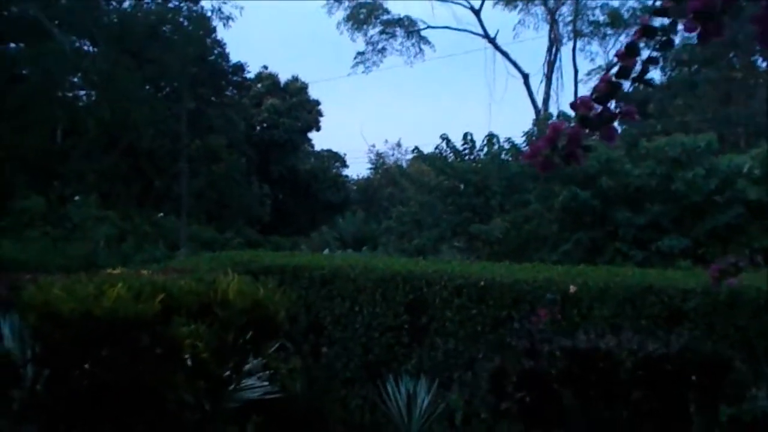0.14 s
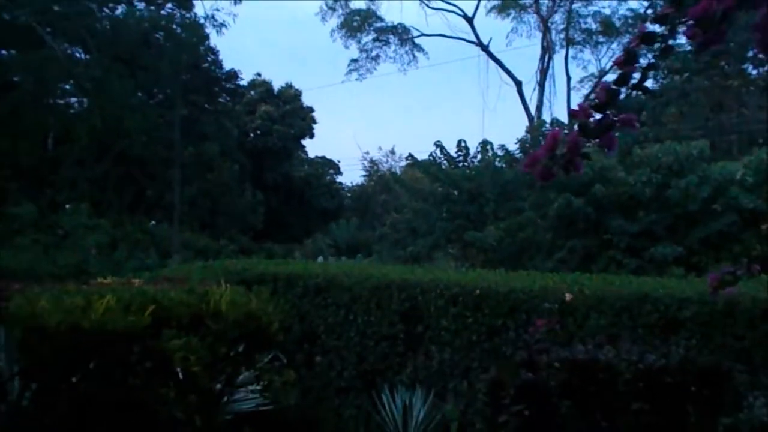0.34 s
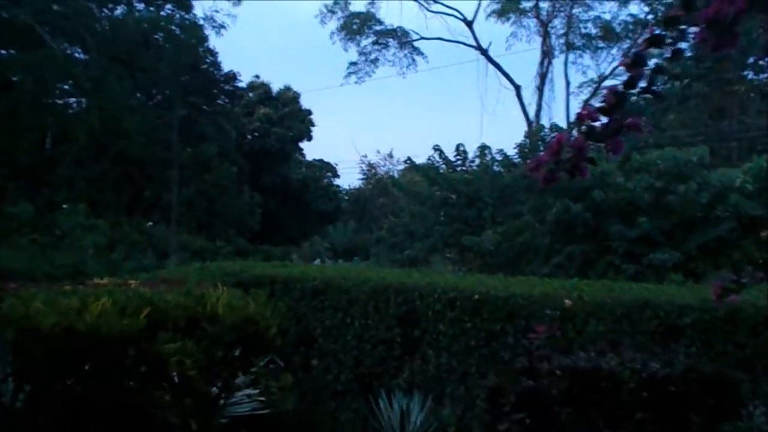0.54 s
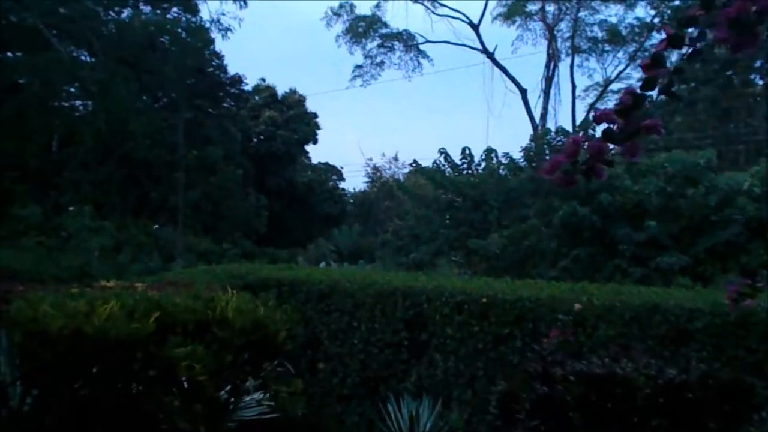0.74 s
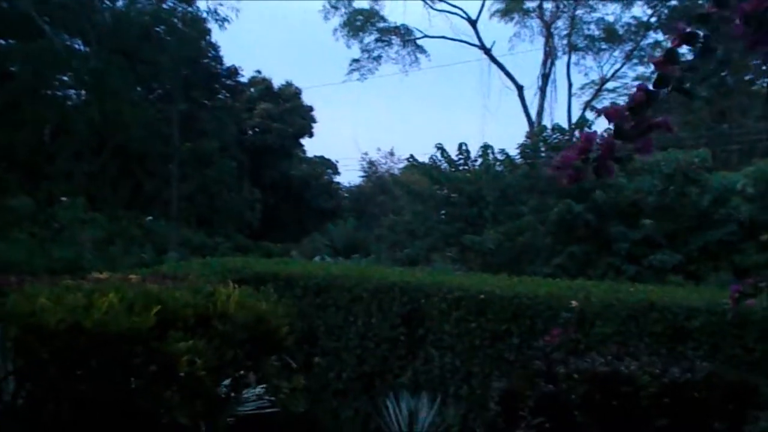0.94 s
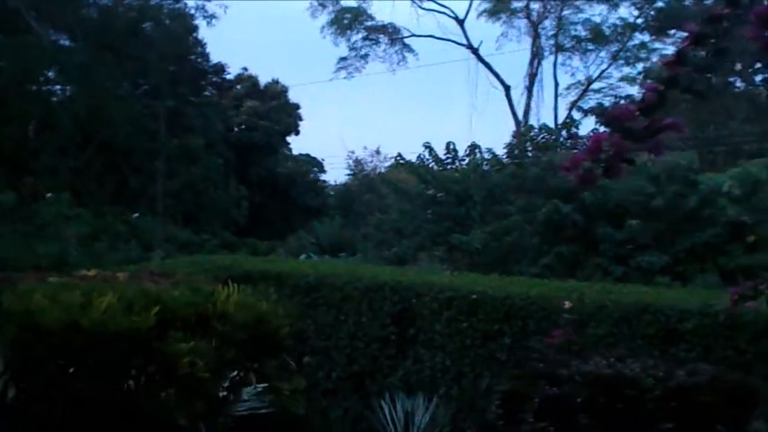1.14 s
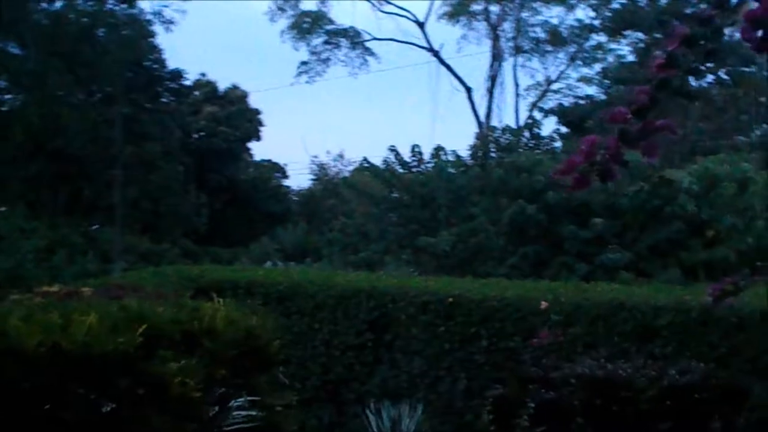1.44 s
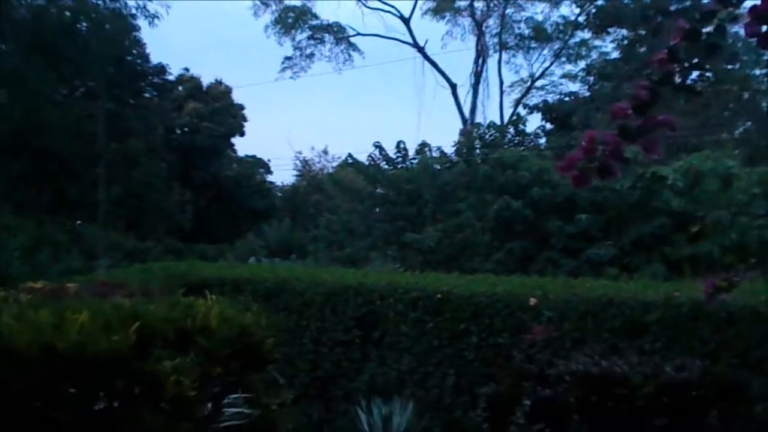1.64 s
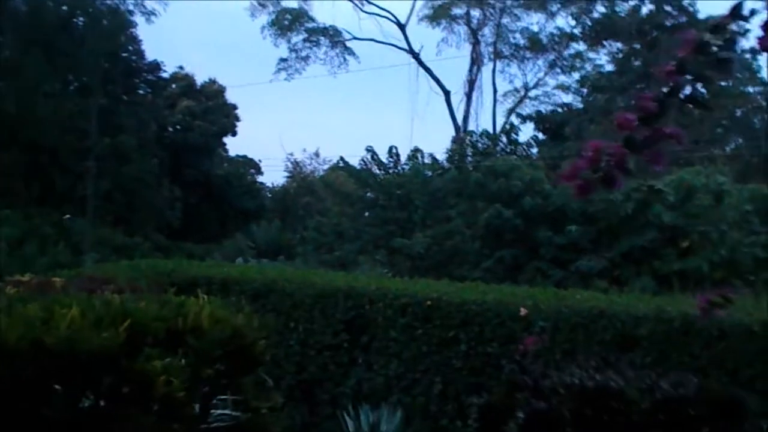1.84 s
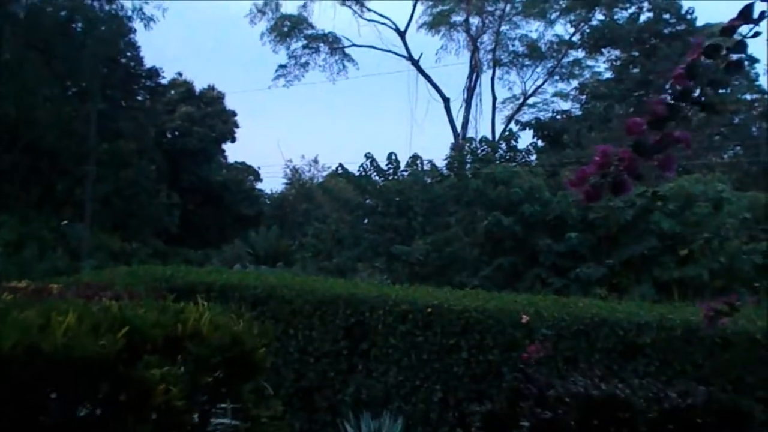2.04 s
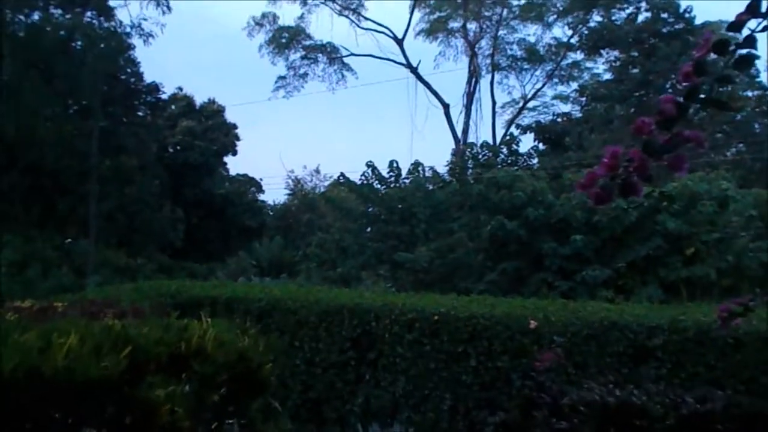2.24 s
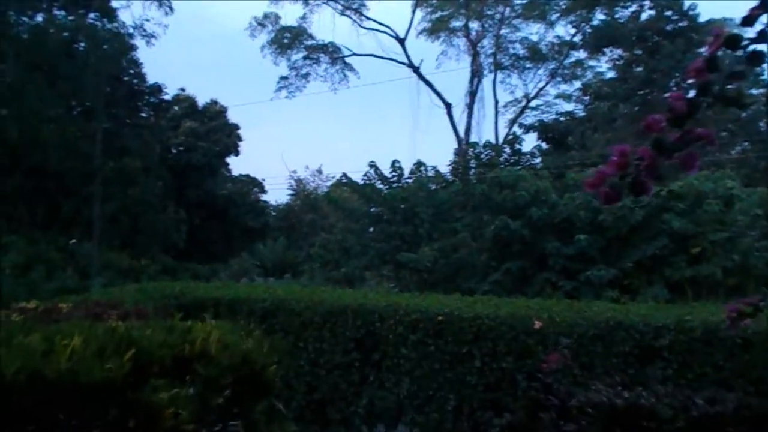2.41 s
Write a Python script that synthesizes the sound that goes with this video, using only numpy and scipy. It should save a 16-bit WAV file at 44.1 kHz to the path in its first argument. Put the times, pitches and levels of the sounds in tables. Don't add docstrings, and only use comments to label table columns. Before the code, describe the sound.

Distant howler monkeys roar hoarsely from the start, with overlapping hollow hoots, weakening after 1.5 seconds and nearly gone by 2.5. A frog pipes broken notes on one pitch throughout. Paired bird whistles come near 0.4, 1.1 and 1.9 seconds; a chip trill slows until 1.3. A harsh rasp bursts at 1.06, a sharp close beak snap at 2.1. Insects and air hiss continue; trees add echo.

```python
import sys
import numpy as np
from scipy import signal
from scipy.fft import rfft, irfft
from scipy.io import wavfile
from scipy.ndimage import uniform_filter1d

SR = 44100
rng = np.random.default_rng(int(sys.argv[2]) if len(sys.argv) > 2 else 0)


def dump(signal):
    limited = np.clip(np.atleast_2d(signal).T, -1, 1)
    pcm = np.round(limited * 32767).astype(np.int16)
    wavfile.write(sys.argv[1], SR, pcm)


def undo_db(level):
    steps = np.asarray(level, float) / 20
    return 10 ** steps


N = 113337
TIME = np.arange(N) / SR

# [t/s, effort level/dB, upper throat resonance f/Hz]
ROAR = [(0, -21.5, 813), (0.151, -23, 960), (.36, -25.5, 858), (0.498, -22.5, 843), (.8, -24, 922),
        (1.05, -25.5, 872), (1.25, -26, 817), (1.48, -28, 924), (1.702, -28.5, 876), (1.9, -31.5, 884),
        (2.57, -37, 932)]
GROWL_HZ = [61.8, 82.04, 100.8]
# [f/Hz, width/Hz, level/dB]
THROAT_SAC = [(438.5, 46.6, -7), (504, 71, 1.5), (670, 90, -5.5), (1424, 177, -8)]
# [t/s, level/dB, low ring f/Hz]
LOW_RING = [(0, -2.5, 499.5), (.3, -1.5, 500), (.5, -1.5, 503.4), (.8, -1, 491.5), (1.2, -0.5, 468),
            (1.4, 0.5, 478), (1.6, -1.5, 481), (2.0, -2, 486), (2.57, -1, 506)]
# [t/s, length/s, from f/Hz, to f/Hz, level/dB]
HOOTS = [(0, .11, 860, 910, -27.5), (.12, .13, 980, 1000, -31), (.15, .09, 520, 535, -31),
         (.27, .1, 930, 960, -34), (.35, .07, 840, 830, -30), (.43, .17, 512, 495, -25),
         (.475, .06, 815, 812, -26), (.52, .12, 770, 800, -30), (.62, .13, 495, 478, -29),
         (.69, .08, 930, 960, -30), (.8, .085, 830, 815, -28), (.86, .06, 900, 960, -31),
         (.82, .13, 480, 490, -30), (.89, .12, 760, 730, -32), (.97, .06, 935, 930, -33),
         (1.0, .05, 450, 450, -31), (1.06, .15, 490, 455, -30), (1.08, .08, 870, 860, -30),
         (1.18, .13, 860, 830, -30), (1.2, .11, 720, 715, -32), (1.385, .11, 495, 478, -22),
         (1.46, .09, 960, 940, -31), (1.6, .13, 930, 870, -27.5), (1.72, .09, 900, 890, -33),
         (1.67, .165, 510, 495, -25)]
# [t/s, length/s, from f/Hz, to f/Hz, level/dB]
MOAN = [
    (.08, .27, 297.6, 311.3, -49.5),
    (.36, 1.06, 313, 273.8, -51.5),
]
# [t/s, length/s, level/dB]
FROG_NOTES = [(0, .022, -23), (.075, .095, -27.5), (.19, .2, -33), (.42, .115, -30), (.555, .155, -30),
              (.725, .12, -31), (.85, .135, -28.5), (1.0, .05, -28), (1.08, .07, -30), (1.195, .055, -28),
              (1.26, .155, -29), (1.432, .11, -30), (1.585, .072, -27.5), (1.68, .045, -26.5),
              (1.795, .085, -30), (1.905, .065, -28), (1.995, .105, -28), (2.135, .21, -29),
              (2.385, .035, -32), (2.49, .045, -35)]
# [t/s, level/dB]
AIR_LEVEL = [(0, -24), (.5, -27), (1.15, -23.5), (1.65, -27), (2.001, -26.5), (2.57, -27.5)]
# [f/Hz, level/dB]
AIR_COLOUR = [(200, -78), (370, -27), (700, -7.5), (1900, -11.5), (2750, -1), (4730, -23.5), (7500, -29.5),
              (10400, -30.5), (11000, -58)]
# [f/Hz, width/Hz, level/dB, throb rate/Hz]
INSECTS = [
    (2750, 450, -33, 33),
    (5900, 800, -40, 22),
    (10860, 120, -66, 5),
]
# [t/s, top f/Hz, level/dB]
CHIPS = [(.05, 6500, -38), (.14, 6800, -40), (0.224, 6400, -36.5), (.312, 6390, -33.5), (.396, 6300, -32.5),
         (0.487, 6300, -32.5), (0.573, 6200, -33), (0.668, 6350, -33), (0.755, 5980, -35)]
# [t/s, top f/Hz, level/dB]
LATE_CHIPS = [(.846, 5800, -36.5), (0.947, 5800, -31.5), (1.03, 5500, -27), (1.163, 5750, -29),
              (1.279, 5800, -33)]
# [t/s, length/s, from f/Hz, to f/Hz, level/dB]
RISERS = [
    (.352, 0.14, 2242, 3050, -18),
    (1.1, 0.12, 2322, 2990, -21),
    (1.84, 0.11, 2294, 2953, -21),
]
# [t/s, length/s, from f/Hz, to f/Hz, level/dB]
LEVELLERS = [
    (.525, .175, 2260, 2850, -20),
    (1.255, .155, 2290, 2820, -21),
    (1.995, .165, 2270, 2800, -21),
    (0.069, 0.075, 2825, 2810, -18.5),
]
# [t/s, length/s, from f/Hz, to f/Hz, level/dB]
BUZZES = [(1.115, .075, 6400, 8800, -37), (1.17, .16, 8800, 8750, -41), (.12, .07, 9600, 8300, -51),
          (.13, .15, 9550, 9450, -55), (.525, .06, 8550, 7700, -50), (.55, .12, 8450, 8350, -54),
          (.782, .014, 8200, 6500, -44), (1.375, .07, 4500, 6000, -39), (1.925, .075, 8500, 8100, -47),
          (.27, .012, 9500, 7300, -48), (1.93, .64, 3400, 3350, -32)]
# [t/s, length/s, from f/Hz, to f/Hz, level/dB]
WHISTLES = [(.59, 0.073, 3150, 3310, -28.5), (.61, 0.19, 4000, 4550, -40), (.725, 0.057, 4000, 3800, -32),
            (.76, 0.18, 3700, 3350, -28.5), (.88, 0.12, 3250, 3400, -30), (1.308, 0.115, 7400, 6600, -27.5),
            (1.8, 0.2, 7400, 7330, -47), (2.0, 0.25, 7200, 7100, -46), (2.45, 0.12, 3350, 3150, -31),
            (2.3, .08, 3400, 3520, -37), (1.49, 0.04, 3550, 3600, -36), (1.53, 0.04, 3900, 4050, -43),
            (2.0, .07, 3650, 3700, -41)]
# [f/Hz, level/dB]
RASP_COLOUR = [(900, -48), (1500, -19.5), (2780, -4), (4050, -13), (5330, -14.5), (7000, -17), (10400, -19),
               (11200, -46)]
# [t/s, f/Hz]
RASP_BEAK = [
    (1.0, 2300),
    (1.04, 2760),
    (1.058, 3110),
    (1.08, 2660),
    (1.12, 2400),
]
# [t/s, level/dB]
RASP_JOLTS = [(1.031, -12), (1.0395, -8), (1.0455, -7), (1.0603, -1.5), (1.0685, -9), (1.0745, -7),
              (1.0795, -9), (1.084, -8), (1.1, -9)]
# [t/s, length/s, from f/Hz, to f/Hz, level/dB]
FAR_CHIRPS = [(1.485, .07, 4900, 5350, -37), (1.62, .055, 4850, 5150, -36), (1.735, .075, 4100, 4650, -41),
              (1.865, .1, 4100, 4750, -42), (2.02, .06, 3900, 4500, -42), (2.155, .075, 4100, 4550, -38.5)]
TREBLE_DIPS = [.34, 1.434, 1.512, 1.554, 1.598, 1.64, 1.789, 2.108, 2.193]


def evened(x):
    return x / np.sqrt(np.mean(x ** 2) + 1e-20)


def add(mix, s, sound):
    part = mix[max(round(s * SR), 0):][:len(sound)]
    part += sound[:len(part)]


def slow(hz):
    spectrum = rfft(rng.standard_normal(N))
    return evened(irfft(spectrum / (1 + (np.fft.rfftfreq(N, 1 / SR) / hz) ** 4), N))


def resonate(x, hz, width):
    turn = np.exp(2j * np.pi * np.cumsum(hz * np.ones(len(x))) / SR)
    r = np.exp(-np.pi * width / SR)
    return 2 * (turn * signal.lfilter([1 - r], [1, -r], x / turn)).real


def resonate_twice(x, hz, width):
    return resonate(resonate(x, hz, width), hz, width)


def coloured(x, points):
    f, db = np.transpose(points)
    log_hz = np.log(np.fft.rfftfreq(N, 1 / SR) + 1)
    return evened(irfft(rfft(x) * undo_db(np.interp(log_hz, np.log(f), db)), N))


def trees(x, t60, wet_db):
    t = np.arange(SR // 2) / SR
    tail = rng.standard_normal(len(t)) * undo_db(-60 * t / t60) * np.minimum(t / 0.011, 1)
    return x + undo_db(wet_db) * signal.fftconvolve(x, tail / np.linalg.norm(tail))[:N]


def whistles(rows, bend, swell, flutter_db, blur_hz, blur_rate_hz):
    out, flutter, blur = np.zeros(N), slow(48), slow(blur_rate_hz)
    for start, length, from_hz, to_hz, db in rows:
        at = round(start * SR)
        u = (np.arange(0, length, 1 / SR) / length)[:N - at]
        now = slice(at, at + len(u))
        hz = to_hz + (from_hz - to_hz) * (1 - u) ** bend + blur_hz * blur[now]
        shape = np.sin(np.pi * u ** swell) ** 0.53 * undo_db(db + 1.5 + flutter_db * flutter[now])
        add(out, start, shape * np.sin(2 * np.pi * np.cumsum(hz) / SR))
    return out


def howlers():
    drive = 0.51 * rng.standard_normal(N)
    for hz in GROWL_HZ:
        turns = np.cumsum(hz * (1 + .25 * slow(40))) / SR
        drive = drive + .5 * evened(np.exp(-(turns % 1) / 0.076) * rng.standard_normal(N))

    def ring(hz, width):
        return resonate_twice(drive, hz, width) * np.sqrt(100 / width)

    s, effort_db, upper_hz = np.transpose(ROAR)
    low_s, low_db, low_hz = np.transpose(LOW_RING)
    shift = np.interp(TIME, low_s, low_hz) / 500
    lower = sum(undo_db(g) * ring(hz * shift * (1 + 0.026 * slow(4.5)), w) for hz, w, g in THROAT_SAC)
    glide_hz = np.interp(TIME, s, upper_hz)
    upper = sum(undo_db(g) * ring(share * glide_hz, 150) for share, g in [(1.023, -1.1), (0.888, -1.46)])
    throat = undo_db(np.interp(TIME, low_s, low_db)) * lower + undo_db(0.5) * upper
    roar = undo_db(-1.5 + np.interp(TIME, s, effort_db)) * evened(trees(throat, t60=.3, wet_db=-4))
    hoots = whistles(HOOTS, 1.1, .9, 2.5, 10, 30)
    moan = whistles(MOAN, 1.4, 1.13, 2.2, 9.3, 15)
    return roar + trees(hoots + moan, 0.19, -6)


def frog():
    gate = np.zeros(N)
    for s, length, db in FROG_NOTES:
        gate += undo_db(db) * np.clip(np.minimum(TIME - s + 0.012, s + length - TIME) / 0.018, 0, 1)
    flutter = undo_db(2.4 * slow(45))
    pitch_hz = 2175 + 12 * slow(19.7)
    tone = np.sqrt(2) * np.sin(2 * np.pi * np.cumsum(pitch_hz) / SR)
    return trees(gate * flutter * tone, 0.3, -13)


def air():
    s, db = np.transpose(AIR_LEVEL)
    return undo_db(-2 + np.interp(TIME, s, db)) * coloured(rng.standard_normal(N), AIR_COLOUR)


def insects():
    out = np.zeros(N)
    for hz, width, db, rate in INSECTS:
        band = evened(resonate_twice(rng.standard_normal(N), hz, width))
        level = undo_db(db + 0.34 * slow(22))
        throb = 1 + .25 * np.sin(2 * np.pi * np.cumsum(rate * (1 + 0.205 * slow(3.1))) / SR)
        out = out + level * band * throb
    return out


def chip_trill():
    length, from_hz = 0.037, 5100
    chips = [(s, length, from_hz, hz, db) for s, hz, db in CHIPS]
    late = [(s, length, from_hz, hz, db) for s, hz, db in LATE_CHIPS]
    trill = whistles(chips, 2.2, 1.1, 2.5, 60, 200) + whistles(late, 1.9, .45, 2.5, 50, 200)
    return trees(trill, .25, -2.5)


def paired_whistles():
    risers = whistles(RISERS, 1.4, 1.3, 1.8, 14, 103)
    levellers = whistles(LEVELLERS, 1.9, 1.2, 1.8, 14, 103)
    return trees(risers + levellers, 0.45, -5.5)


def buzzes():
    return trees(whistles(BUZZES, 1.3, .8, 2.5, 200, 500), .4, -1.5)


def other_whistles():
    return trees(whistles(WHISTLES, 2.1, 0.74, 1.9, 53, 270), 1.0, -1.7)


def rasp():
    turns = np.cumsum(190 * (1 + 0.32 * slow(65))) / SR
    burr = coloured((.65 + 1.1 * np.exp(-(turns % 1) / .3)) * rng.standard_normal(N), RASP_COLOUR)
    beak_hz = np.interp(TIME, *np.transpose(RASP_BEAK))
    burr = evened(burr + 0.94 * resonate(burr, beak_hz, 670))
    lag = TIME - 1.06
    span = np.where(lag < 0, 0.036, 0.05)
    out = undo_db(-17.5) * burr * np.exp(-(abs(lag) / span) ** 1.4)
    t = np.arange(1500) / SR
    for s, db in RASP_JOLTS:
        decay = undo_db(db - 60 * t / 0.012) * np.minimum(t / 0.00043, 1)
        add(out, s, decay * np.sin(2 * np.pi * beak_hz[round(s * SR)] * t))
    return out


def far_chirps():
    return trees(whistles(FAR_CHIRPS, 3.1, 0.48, 1.5, 68, 195), 0.67, 0.23)


def beak_snap():
    out, t = np.zeros(N), np.arange(1500) / SR
    decay = undo_db(-3.5 - 60 * t / .022) * np.minimum(t / 0.00024, 1)
    noise = coloured(rng.standard_normal(N), RASP_COLOUR[4:])[:len(t)]
    add(out, 2.0912, decay * (np.sin(2 * np.pi * 2800 * t) + 0.064 * noise))
    return out


def scene():
    animals = howlers() + frog()
    rasping, snap = rasp(), beak_snap()
    birds = paired_whistles() + far_chirps() + other_whistles() + chip_trill() + buzzes()
    birds = birds + trees(rasping, .35, -11) + snap
    return (animals + birds + air() + insects())[None]


def top_cut(x):
    return signal.sosfilt(signal.butter(12, 11200, fs=SR, output="sos"), x)


def record(dry):
    x = signal.sosfilt(signal.butter(6, 300, "high", fs=SR, output="sos"), dry[0])
    low_noise = [(60, -13), (150, -3.0), (300, 8), (600, -37)]  # f/Hz, level/dB
    x = x + undo_db(-66) * coloured(rng.standard_normal(N), low_noise)
    hz, t, z = signal.stft(x, SR, nperseg=256, noverlap=192)
    dip_db = sum(-13 * np.exp(-((t - s) / .0075) ** 4) for s in TREBLE_DIPS)
    local = uniform_filter1d(uniform_filter1d(abs(z), 5, 0), 9, 1)
    faint = local < 1.7 * np.median(abs(z), 1)[:, None]
    z = z * undo_db(dip_db * faint * (hz[:, None] > 3000))
    x = signal.istft(z, SR, nperseg=256, noverlap=192)[1][:N]
    x = x / (1 + (abs(x) / 1.3) ** 6) ** (1 / 6)
    tick = undo_db(-39) * np.exp(-((TIME - 1.425) / 0.00075) ** 2)
    return top_cut((x + tick)[None])


dry = scene()
out = record(dry)
dump(out)
```